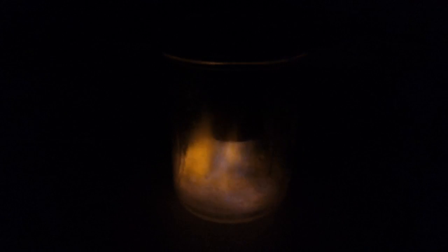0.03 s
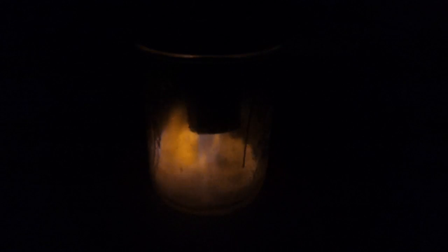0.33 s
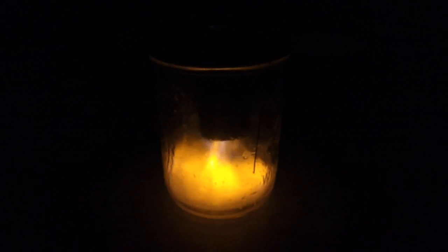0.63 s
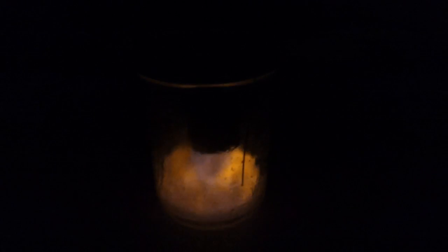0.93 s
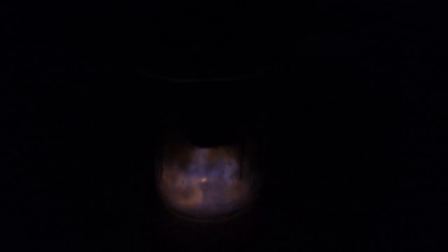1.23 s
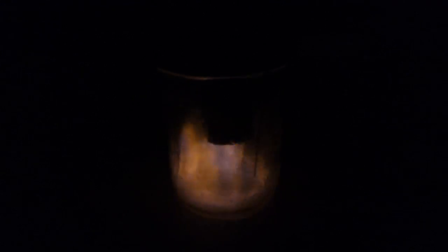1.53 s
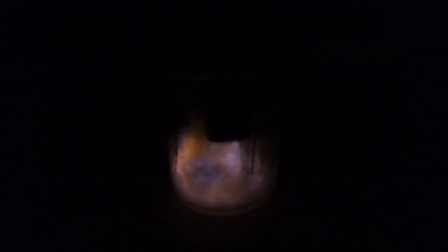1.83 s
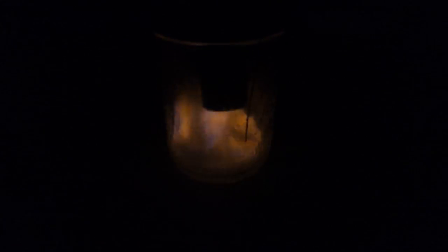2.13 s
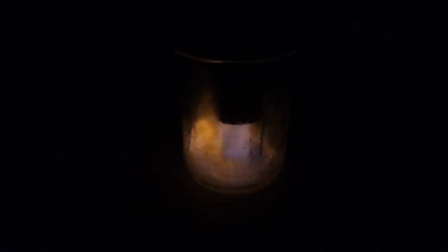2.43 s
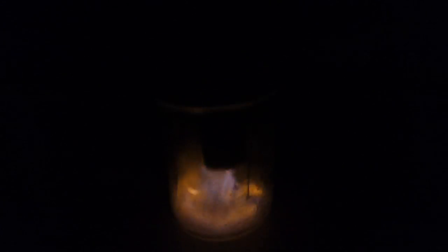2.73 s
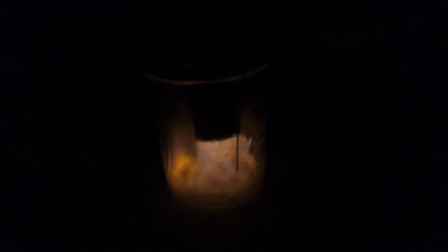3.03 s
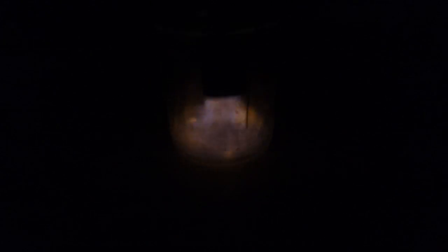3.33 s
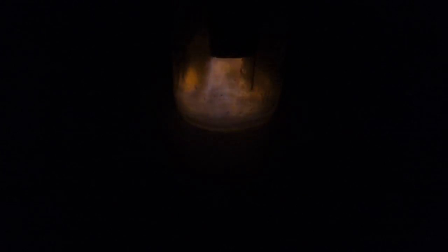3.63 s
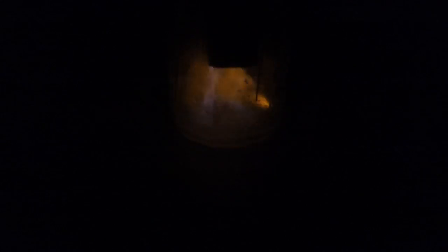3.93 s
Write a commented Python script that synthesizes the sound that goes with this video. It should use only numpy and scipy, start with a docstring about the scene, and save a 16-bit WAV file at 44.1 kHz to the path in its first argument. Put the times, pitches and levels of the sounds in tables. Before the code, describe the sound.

Close up in a small room, fire sputters inside a glass jar. Fast, low puffs and ringing knocks run throughout, with uneven hissing spits through the narrow opening and a soft roar and hiss underneath.

```python
"""A rapid, spitting flutter of knocks and puffs: a flame pulsing about 28 times a second in a glass jar
with a narrow opening, close by in a small room. Each pulse gulps air with a knock that rings jar and
room, then pushes out a low puff of gas that hisses through the opening. Hard pulses spit loudly and
leave a short sizzle. A low roar and a steady hiss lie underneath."""
import sys
import numpy as np
from scipy import signal
from scipy.fft import rfft, irfft, next_fast_len
from scipy.io import wavfile
from scipy.ndimage import uniform_filter1d

SR = 44100
rng = np.random.default_rng(int(sys.argv[2]) if len(sys.argv) > 2 else 0)


def generate_wav(sig):
    """Save sig (samples, or channels by samples) to the path in sys.argv[1] as 16-bit PCM at SR."""
    pcm = np.round(np.clip(np.atleast_2d(sig).T, -1, 1) * 32767).astype(np.int16)
    wavfile.write(sys.argv[1], SR, pcm)


N = 176400
TIME = np.arange(N) / SR

# hard pulses (time [s], hiss [dB], puff [dB], knock [dB])
HARD_PULSES = [(0.004, -27, -10, -15), (0.034, -36, -9, -5), (0.072, -24, -6, -11), (0.103, -36, -11, -14),
               (0.139, -27, -9, -14), (0.203, -28, -7, -4), (0.269, -25, -4, -9), (0.338, -29, -12, -8),
               (0.372, -39, -12, -9), (0.404, -40, -11, -8), (0.48, -28, -6, -10), (0.515, -30, -12, -9),
               (0.547, -38, -12, -9), (0.61, -18, -3, -7), (0.675, -29, -6, -6), (0.746, -29, -7, -8),
               (0.812, -38, -12, -10), (0.889, -32, -14, -10), (0.963, -40, -15, -9), (1.006, -22, -9, -14),
               (1.156, -25, -10, -12), (1.229, -38, -12, -8), (1.266, -24, -6, -13), (1.299, -38, -13, -6),
               (1.338, -30, -10, -10), (1.444, -27, -10, -8), (1.477, -23, -6, -8), (1.507, -31, -9, -9),
               (1.573, -24, -5, -4), (1.603, -22, -2, -11), (1.635, -28, -4, -10), (1.665, -32, -5, -9),
               (1.699, -25, -5, -5), (1.731, -27, -4, -6), (1.857, -24, -7, -17), (2.019, -25, -11, -18),
               (2.094, -23, -5, -19), (2.129, -35, -12, -4), (2.171, -29, -12, -11), (2.208, -21, -7, -12),
               (2.237, -29, -4, -14), (2.276, -23, -11, -9), (2.303, -33, -8, -6), (2.335, -32, -6, -10),
               (2.374, -24, -9, -12), (2.585, -30, -8, -14), (2.658, -34, -13, -7), (2.695, -29, -10, -13),
               (2.728, -22, -7, -10), (2.828, -26, -9, -16), (2.897, -30, -11, -9), (2.968, -24, -8, -19),
               (3.037, -20, -7, -8), (3.064, -35, -11, -8), (3.096, -27, -6, -13), (3.166, -24, -5, -18),
               (3.202, -24, -9, -13), (3.278, -25, -6, -6), (3.316, -38, -8, -8), (3.351, -40, -6, -11),
               (3.399, -27, -12, -10), (3.435, -34, -8, -12), (3.477, -32, -7, -8), (3.515, -29, -12, -12),
               (3.553, -24, -8, -14), (3.587, -27, -12, -6), (3.623, -33, -10, -7), (3.656, -18, -3, -7),
               (3.69, -29, -9, -7), (3.758, -32, -7, -9), (3.799, -27, -5, -15), (3.872, -25, -9, -6),
               (3.959, -24, -9, -9)]
# strength of the ordinary pulses (time [s], puff [dB], knock [dB])
EFFORT = [(0, -9, -8), (.28, -9.5, -13), (.45, -8, -13), (.8, -13.5, -12), (1.12, -16, -13.5),
          (1.3, -8.5, -13.5), (1.65, -12.5, -9.5), (1.95, -13.5, -12.5), (2.3, -13, -10.5),
          (2.52, -10.5, -14), (2.8, -13, -12), (3.15, -8, -13.5), (3.7, -16, -9.5), (4, -4.5, -12)]
# steady hiss envelope (time [s], level [dB])
WASH_LEVEL = [(0.0, -33), (0.36, -35.5), (0.67, -33.5), (1.1, -35.5), (1.37, -33.5), (1.62, -32),
              (1.97, -39), (2.31, -30.5), (2.9, -35), (3.15, -33.5), (3.36, -35), (3.74, -35.5),
              (4.0, -37.5)]
# drive of the upper knock modes (time [s], gain [dB])
UPPER_DRIVE = [(0, -7), (.5, 4), (.62, -11.5), (.95, -3), (1.2, -5), (1.3, -0.5), (1.42, -2), (3.2, 0),
               (3.35, 2.5), (3.7, 3.5), (4, -2)]
# glassy rings (time [s], frequency [Hz], level [dB])
PINGS = [(0.611, 1420, -32.5), (1.603, 1710, -34), (2.276, 1970, -38), (3.656, 3470, -36)]

# resonances (frequency [Hz], level [dB], t60 [s])
WASH_MODES = [(1074, -10.5, 0.42), (1260, -4.5, 0.16), (1856, -17, 0.12), (2137, -2.5, 0.24),
              (2326, -0.5, 0.25), (2547, -1, 0.17), (2616, 13.5, 0.021)]  # in the steady hiss
BOOM_MODES = [(30, -21, .3), (62, -11.5, .12), (96, -19, .14)]  # low booms, driven by puffs: the flame's own pulsing near 30 Hz, and higher ones
KNOCK_MODES = [(184, -16, 0.12), (224.8, -34, 0.4), (344, -17, 0.2), (370.6, -17.5, 0.23),
               (402.3, -19, 0.23), (448, -16, 0.11), (480, -20.5, 0.039), (501, -15.5, 0.065),
               (655.2, -14, 0.065), (780, -28, 0.15)]  # jar and room, driven by knocks

# noise spectra (frequency [Hz], relative level [dB])
WASH_SPECTRUM = [(300, 19), (1000, 6), (1700, 5.5), (2600, -0.5), (3200, 0.5), (4500, 1), (6500, 2),
                 (8000, -1.5), (9500, -5.5), (12000, -10), (14500, -20)]  # steady hiss
ROAR_SPECTRUM = [(20, -16), (45, -0.5), (110, 2), (170, -3), (260, 0.5), (340, -0.5), (500, -4.5),
                 (590, -64.5), (670, -16), (780, -36.5), (1000, -34.5), (2000, -45), (5000, -80)]  # burning
JET_SPECTRUM = [(300, -14), (900, 5.5), (1300, 2), (2000, 2.5), (3500, 2), (5500, 1.5), (7500, 4),
                (9500, -6), (12000, -7.5), (14500, -36)]  # gas through the opening
SNAP_SPECTRUM = [(1000, -4), (7000, 4), (14500, -5)]  # onset of a spit
SIZZLE_SPECTRUM = [(300, -13), (1000, -11.5), (2500, -2.5), (4000, -3), (6000, -2), (7800, -1),
                   (9500, -7.5), (12000, -16), (14500, -56)]  # tail of a spit

# response of the jar's body (frequency [Hz], gain [dB])
JAR_BODY = [(170, 4.5), (205, -2), (228, 5.5), (250, -12.5), (272, -2.5), (525, 0), (572, -2), (612, -9.5),
            (652, 3.5), (725, -2), (780, 8.5), (950, 0), (1200, 5.5)]
# stereo balance (frequency [Hz], left minus right [dB])
BALANCE = [(60, 0), (200, 0), (370, 1.5), (680, 2), (1240, -.8), (2100, -2), (2800, .5), (4200, 5.5),
           (7000, 6.5), (9500, 3.5), (11000, 0), (13000, -6), (14500, 0)]

PULSE_HZ, JITTER_S, SCATTER_DB, MAX_PULSES = 27.3, 0.0006, 1.2, 200
JET_RISE_S, JET_FALL_S = 0.0024, 0.0069


def amp(db):
    """Decibels to gain."""
    return 10 ** (np.asarray(db) / 20)


def unit(x):
    """Scale to rms 1."""
    return x / np.sqrt(np.mean(x ** 2) + 1e-20)


def colour(x, curve):
    """Minimum-phase filter from (frequency [Hz], gain [dB]) points."""
    hz, db = np.transpose(curve)
    size = 2 * next_fast_len((N + SR // 4) // 2)
    bins_hz = abs(np.fft.fftfreq(size, 1 / SR))
    log_gain = np.log(amp(np.interp(np.log(bins_hz + 1), np.log(hz), db)))
    response = np.exp(np.conj(signal.hilbert(log_gain))[:size // 2 + 1])
    return irfft(rfft(x, size) * response, size)[..., :N]


def stereo(a, b, correlation):
    """Correlated left/right pair from two independent noises."""
    return np.array([a, correlation * a + np.sqrt(1 - correlation ** 2) * b])


def noise(spectrum, correlation):
    """Coloured stereo noise, rms 1."""
    a, b = rng.standard_normal((2, N))
    return unit(colour(stereo(a, b, correlation), spectrum))


def patchy(x, patch_hz=900, patch_s=0.035, depth_db=2.2):
    """Random time-frequency patches give each burst its own colour."""
    hz, t, spectrum = signal.stft(x, SR, nperseg=256)
    field = rng.standard_normal((len(t), len(hz)))
    field = uniform_filter1d(field, round(patch_s / t[1]), axis=0)
    field = uniform_filter1d(field, round(patch_hz / hz[1]), axis=1)
    _, patched = signal.istft(spectrum * amp(depth_db * unit(field).T), SR, nperseg=256)
    return unit(patched[:, :N])


def bell(t, sigma_s):
    """Gaussian bump at t = 0."""
    return np.exp(-0.5 * (t / sigma_s) ** 2)


def burst(t, rise_s, fall_s):
    """Gaussian rise to t = 0, exponential fall."""
    return bell(np.minimum(t, 0), rise_s) * np.exp(-np.maximum(t, 0) / fall_s)


def train(times_s, levels_db, shape):
    """Sum of shape(t) at each time and level."""
    out = np.zeros(N)
    for at_s, gain in zip(times_s, amp(levels_db)):
        centre = int(at_s * SR)
        near = slice(max(0, centre - SR // 25), max(0, centre + SR // 4))
        out[near] += gain * shape(TIME[near] - at_s)
    return out


def ring(x, modes):
    """Drive a bank of decaying modes with x."""
    t = TIME[:SR // 2]
    response = sum(amp(db - 60 * t / t60_s) * np.cos(2 * np.pi * hz * t) for hz, db, t60_s in modes)
    return signal.fftconvolve(x, response)[:N]


def room(x, correlation, t60_s=0.078, build_s=0.013):
    """Short diffuse stereo tail of the small room."""
    t = TIME[:SR // 2]
    envelope = amp(-60 * t / t60_s) * np.minimum(t / build_s, 1)
    a, b = rng.standard_normal((2, len(t))) * envelope
    tails = stereo(a, b, correlation) / np.linalg.norm(a)
    return signal.fftconvolve(np.atleast_2d(x), tails, axes=1)[:, :N]


def wall_echo(x, delay_s=0.0171, gain_db=-10):
    """One reflection off a nearby wall."""
    return amp(gain_db) * np.interp(TIME - delay_s, TIME, x, left=0)


def wash(hollow_db=-13):
    """Steady gas hiss with faint hollow resonances."""
    air = noise(WASH_SPECTRUM, correlation=0.011)
    hollow = unit(np.array([ring(side, WASH_MODES) for side in air]))
    level_db = np.interp(TIME, *np.transpose(WASH_LEVEL))
    return amp(level_db) * (air + amp(hollow_db) * hollow)


def roar(times_s, sigma_s=0.0065, gain_db=-7):
    """Turbulent burning: follows the flame's effort, swells with each pulse."""
    effort_s, _, knock_db = np.transpose(EFFORT)
    swell = train(times_s, np.interp(times_s, effort_s, knock_db),
                  lambda t: bell(t, sigma_s) + 0.32 * bell(t - 2 * sigma_s, 2 * sigma_s))
    return amp(gain_db) * swell * noise(ROAR_SPECTRUM, correlation=1)


def pings(fall_s=0.02):
    """Short glassy rings on a few hard spits."""
    return sum(train([at_s], [db], lambda t: burst(t, JET_RISE_S, fall_s) * np.sin(2 * np.pi * hz * t))
               for at_s, hz, db in PINGS)


def sizzle_envelope(times_s, hiss_db, lag_s=0.013, rise_s=0.0014, fall_s=0.037):
    """Tail of each spit: grows 1.38 dB per dB of hiss; overlaps add in power."""
    def power(t):
        return (np.clip(t / rise_s, 0, 1) * np.exp(-np.maximum(t, 0) / fall_s)) ** 2

    sizzle_db = 1.38 * hiss_db - 2
    return np.sqrt(train(times_s + lag_s, 2 * sizzle_db, power))


def jet(times_s, hiss_db, gain_db=-0.4, snap_lead_s=0.0012, room_db=-11.5, correlation=0.048):
    """Gas hisses through the opening at each puff; hard pulses also snap and sizzle."""
    hard_s, hard_db = np.transpose(HARD_PULSES)[:2]
    hiss = train(times_s, hiss_db + gain_db, lambda t: burst(t, JET_RISE_S, JET_FALL_S))
    snap_db = 2 * hard_db + 17
    snap = train(hard_s - snap_lead_s, snap_db, lambda t: burst(t, rise_s=0.0004, fall_s=0.003))
    gas = hiss * patchy(noise(JET_SPECTRUM, correlation))
    gas += snap * noise(SNAP_SPECTRUM, correlation)
    gas += sizzle_envelope(hard_s, hard_db) * noise(SIZZLE_SPECTRUM, correlation)
    return gas + amp(room_db) * room(gas, correlation=0)


def puffs(times_s, puff_db, gain_db=-4, sigma_s=0.0024, draw_lead_s=0.0062, rebound_lag_s=0.0105):
    """Gas is drawn in, pushed out and drawn in again; low booms ring along."""
    def breath(t):
        draw = 0.55 * bell(t + draw_lead_s, sigma_s=0.003)
        rebound = 0.22 * bell(t - rebound_lag_s, sigma_s=0.0035)
        return bell(t, sigma_s) - draw - rebound

    push = train(times_s, puff_db + gain_db, breath)
    return push + ring(push, BOOM_MODES) / (sigma_s * SR)


def knocks(times_s, knock_db, gain_db=-1, lead_s=0.0066, sigma_s=0.0005, upper_hz=580, ring_db=5):
    """A gulp of air, sharper or duller, rings jar and room just before each puff."""
    early, dull = rng.standard_normal((MAX_PULSES, 2))[:len(times_s)].T
    gulps_s = times_s - lead_s - JITTER_S * early
    widths_s = sigma_s * np.exp(0.15 * dull)
    gulp = np.zeros(N)
    for at_s, db, width_s in zip(gulps_s, knock_db + gain_db, widths_s):
        gulp -= train([at_s], [db], lambda t: bell(t, width_s) - 0.5 * bell(t, 2 * width_s))
    upper_drive = amp(np.interp(TIME, *np.transpose(UPPER_DRIVE)))
    lower = ring(gulp, [mode for mode in KNOCK_MODES if mode[0] < upper_hz])
    upper = ring(gulp * upper_drive, [mode for mode in KNOCK_MODES if mode[0] >= upper_hz])
    return gulp + amp(ring_db) * (lower + upper) / (sigma_s * SR)


def flame_pulses(hiss_re_puff_db=-25):
    """Hard pulses plus ordinary ones in the gaps: (time [s], hiss [dB], puff [dB], knock [dB])."""
    hard = np.transpose(HARD_PULSES)
    edges_s = np.append(hard[0], hard[0, -1] + 2 / PULSE_HZ)
    times_s = np.concatenate([np.linspace(start, end, max(1, round((end - start) * PULSE_HZ)) + 1)[1:-1]
                              for start, end in zip(edges_s, edges_s[1:])])
    effort_s, puff_db, knock_db = np.transpose(EFFORT)
    puff_db = np.interp(times_s, effort_s, puff_db)
    knock_db = np.interp(times_s, effort_s, knock_db)
    levels_db = np.array([puff_db + hiss_re_puff_db, puff_db, knock_db])
    scatter = rng.standard_normal((MAX_PULSES, 4))[:len(times_s)].T
    ordinary = np.vstack([times_s + JITTER_S * scatter[0], levels_db + SCATTER_DB * scatter[1:]])
    return np.hstack([hard, ordinary])


def scene(knock_room_db=-13):
    """Pulsing jar in its room; hiss brighter on the left."""
    times_s, hiss_db, puff_db, knock_db = flame_pulses()
    knock = knocks(times_s, knock_db)
    reflections = wall_echo(knock) + amp(knock_room_db) * room(knock, correlation=1)
    burning = colour(knock + reflections + roar(times_s), JAR_BODY)
    mix = puffs(times_s, puff_db) + burning + jet(times_s, hiss_db) + pings() + wash()
    return np.array([colour(side, [(hz, sign * db / 2) for hz, db in BALANCE])
                     for side, sign in zip(mix, (1, -1))])


def record(dry, highpass_hz=10, lowpass_hz=14600):
    """Bass roll-off, soft clip at full scale, band limit."""
    x = signal.sosfilt(signal.butter(1, highpass_hz, "highpass", fs=SR, output="sos"), dry)
    clipped = x / (1 + x ** 6) ** (1 / 6)
    lowpass = signal.firwin(511, lowpass_hz, window=("kaiser", 9), fs=SR)
    return signal.oaconvolve(clipped, lowpass[None], "same")


dry = scene()
out = record(dry)
generate_wav(out)
```